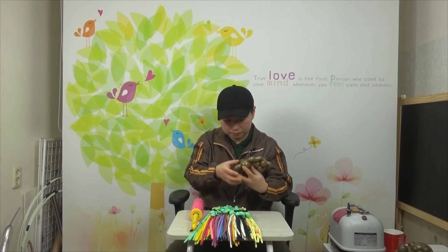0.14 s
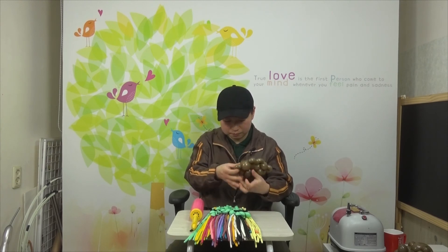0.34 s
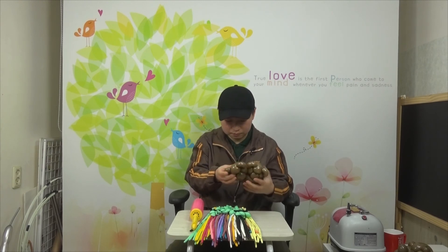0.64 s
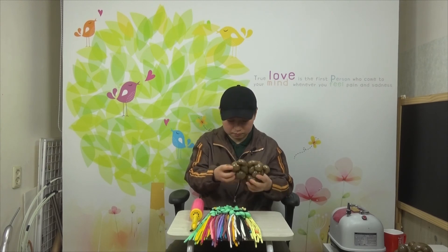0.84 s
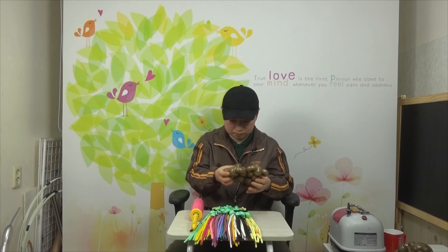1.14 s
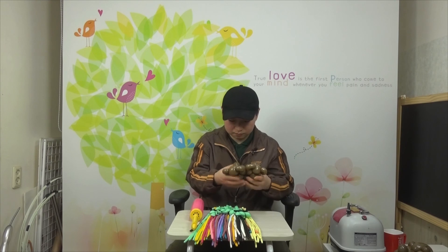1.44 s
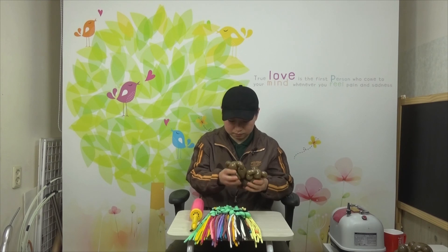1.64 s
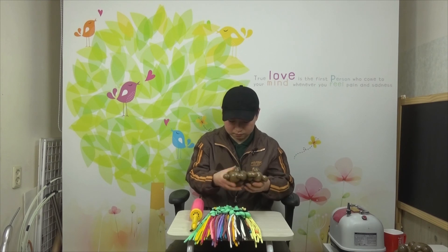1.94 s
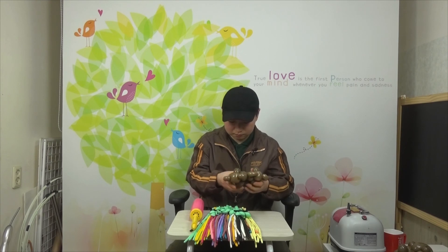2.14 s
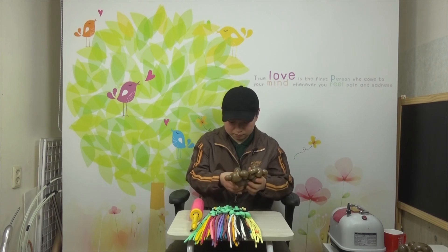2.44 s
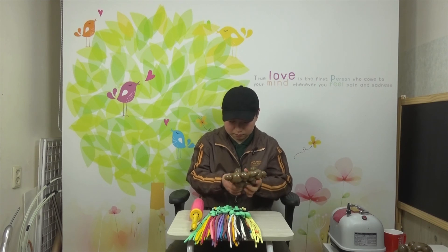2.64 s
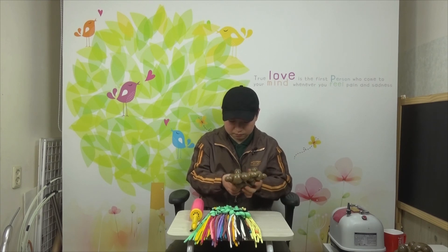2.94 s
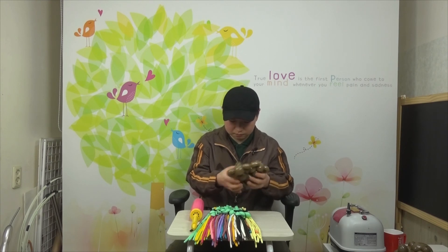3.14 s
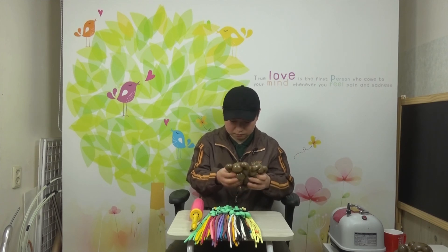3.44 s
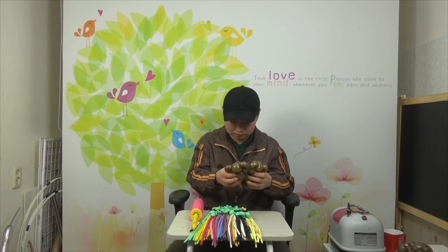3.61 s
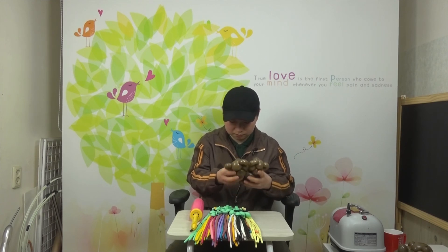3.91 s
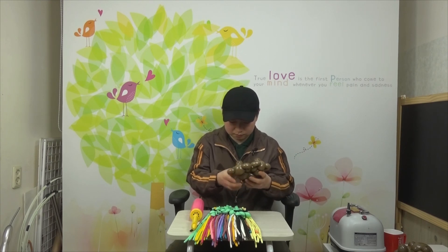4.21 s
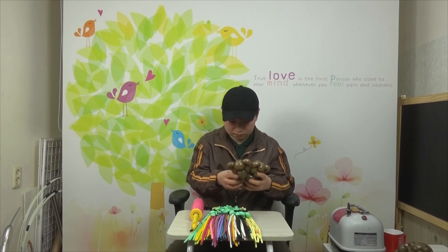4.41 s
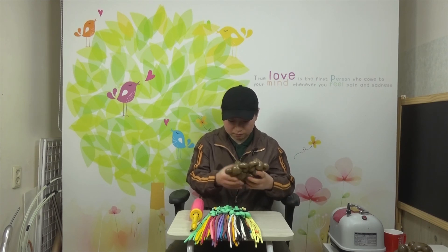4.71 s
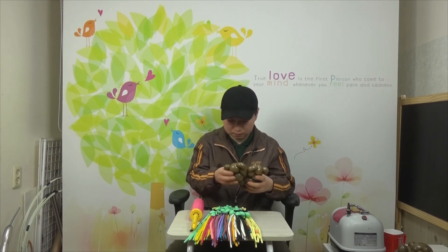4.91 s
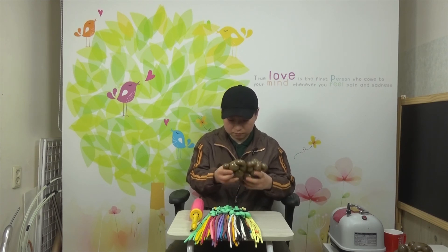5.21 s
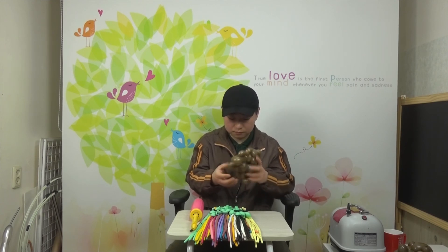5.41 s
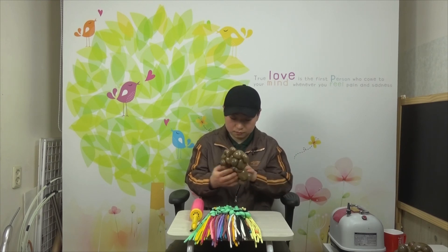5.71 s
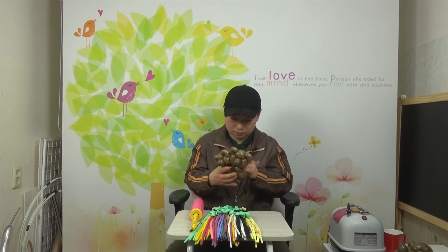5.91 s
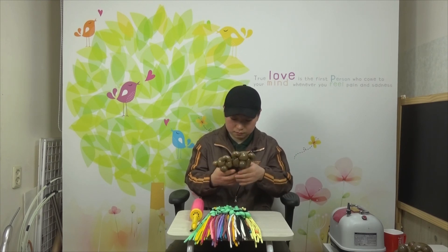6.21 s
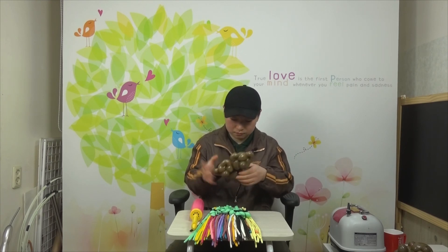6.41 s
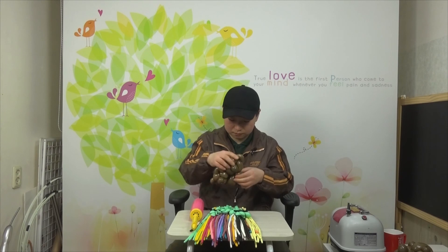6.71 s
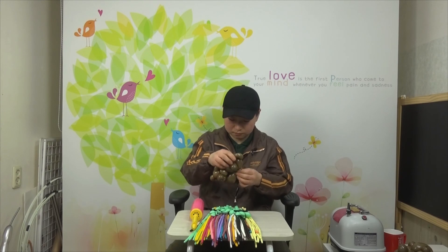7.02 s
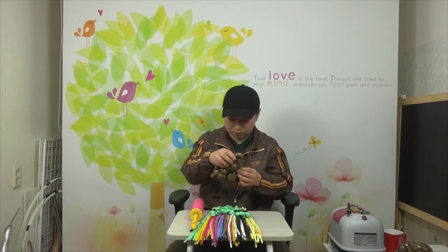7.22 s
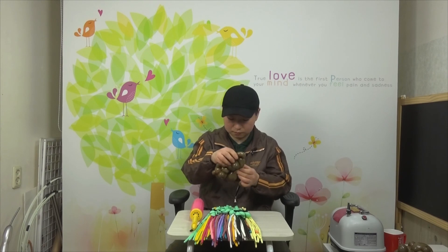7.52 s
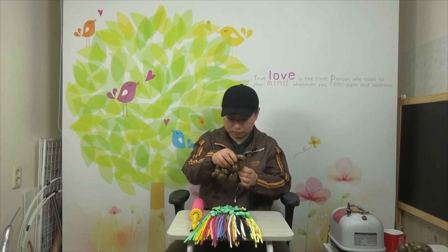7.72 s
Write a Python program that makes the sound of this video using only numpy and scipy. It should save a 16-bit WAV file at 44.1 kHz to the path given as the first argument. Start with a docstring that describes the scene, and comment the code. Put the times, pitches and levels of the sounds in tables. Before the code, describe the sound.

Latex balloons squeak, creak and snap close by as hands squeeze and adjust a twisted balloon figure in a small room.

```python
"""A figure of twisted latex balloons is squeezed and adjusted by hand, close by in a small room.
Rubber first drags over rubber in stick-slip friction; within half a second single slips snap, a bubble
groans under a finger and the bubbles thump softly as they shift. These sounds recur throughout.
From 1.2 to 3.4 s regular runs of slips creak. Near 6 s a smooth swish, like a nylon jacket brushing,
is heard; the heaviest thumps follow, and it ends in more rubbing and snapping."""
import sys
import numpy as np
from scipy import signal
from scipy.io import wavfile
from scipy.ndimage import uniform_filter1d

SR = 44100
rng = np.random.default_rng(int(sys.argv[2]) if len(sys.argv) > 2 else 0)


def output_pcm(signal):
    """Save a mono or channel-first signal as 16-bit PCM at the path in sys.argv[1].

    Samples are clipped to [-1, 1] before scaling.
    """
    pcm = np.clip(np.atleast_2d(signal).T, -1, 1) * 32767
    wavfile.write(sys.argv[1], SR, np.round(pcm).astype(np.int16))


N = 346251
TIME = np.arange(N) / SR

# The skin sounds in three ranges: body, crack and top. Levels are relative within each table.
# Each range: lower edge f/Hz, upper edge f/Hz, resonance f/Hz, bandwidth/Hz, resonance gain
BODY = (167, 1015, 490, 135, 1.2)
CRACK = (1210, 5560, 2210, 1600, 3.9)
TOP = (4170, 15800, 6200, 4700, 1.6)
# Rubbing strokes: t/s, duration/s, crack level midway/dB, swell/dB, body re crack/dB,
# top re crack/dB, rumble level/dB, slip rate/Hz, share of smooth swish (0-1)
RUB_STROKES = [(-0.02, 0.041, -44, -6, 3, -7, -59, 187, 0.9),
               (0.199, 0.14, -50.0, -9.0, 5.5, -11, -69, 130, 0.16),
               (0.349, 0.067, -37, 14, 7, -4.5, -28, 147, 0.3),
               (0.458, 0.226, -36.0, -3.0, 3, -1, -41, 221, 0.32),
               (0.722, 0.053, -44.0, 1.0, 0, -3.5, -40.5, 230, 0.26),
               (0.797, 0.22, -31.0, 15.0, -1, 1, -37, 274, 0.13),
               (1.054, 0.099, -31, 6.5, 1, -0.5, -45, 295, 0.08),
               (1.171, 0.076, -28, -5.5, 7, -3.5, -42, 340, 0.02),
               (1.293, 0.038, -37, 5.5, 2.5, 0.5, -40, 315, 0),
               (1.367, 0.033, -38, -3.5, -1, 1, -37, 290, 0), (1.452, 0.1, -44, 2, 0, 1, -41, 303, 0),
               (1.562, 0.17, -32.0, -1.0, 2, 1.5, -48, 316, 0.07),
               (1.76, 0.069, -35.0, 13.0, 2.5, -6, -58, 280, 0),
               (1.864, 0.15, -28.0, -13.0, -4, -0.5, -43.5, 238, 0.3),
               (2.274, 0.16, -40.0, -8.0, -2, -2, -50, 410, 0.37),
               (2.43, 0.12, -31.0, 21.0, -7.5, -2, -58, 430, 0.01),
               (2.609, 0.2, -35.0, -2.0, -0.5, -1.5, -54, 166, 0.19),
               (2.803, 0.18, -31.0, 0.0, -3, -4, -54, 217, 0.17),
               (2.995, 0.16, -32.0, 16.0, -3.5, -0.5, -45, 273, 0.22),
               (3.2, 0.063, -43, 0, 3, 3.5, -43, 280, 0.22), (3.288, 0.11, -37.5, 5, 11, 2, -42, 267, 0.1),
               (3.412, 0.13, -30, 0.5, -0.5, 1, -47, 320, 0.16),
               (3.576, 0.093, -47, 0, 5.5, 1, -58.5, 252, 0.21),
               (3.672, 0.077, -33, 7.5, 0, -0.5, -41, 260, 0.15),
               (3.863, 0.097, -35.0, -14.0, 3, -5, -38.5, 221, 0.17),
               (3.968, 0.08, -31.0, 4.0, -0.5, 1, -35, 183, 0.1),
               (4.191, 0.072, -30.0, 7.5, -4.5, -2, -41.5, 266, 0.19),
               (4.398, 0.14, -30.0, 7.0, -0.5, 2.5, -38, 327, 0.13),
               (4.581, 0.048, -35.0, 8.5, -1.5, 2.5, -46, 400, 0.12),
               (4.671, 0.12, -33.0, -7.0, 3.5, -0.5, -37, 366, 0.17),
               (4.899, 0.091, -34.0, 9.0, 3, 0, -47, 494, 0.07),
               (4.992, 0.121, -29.0, 4.0, 1.0, -1.0, -45, 200, 0.23),
               (5.171, 0.19, -32.5, 17, 3.0, -1.5, -40.5, 300, 0.34),
               (5.441, 0.23, -47.5, -4, -0.5, -1, -49, 200, 0.57),
               (5.687, 0.061, -34.0, 1.0, 6.5, -0.5, -33.5, 136, 0.31),
               (5.758, 0.13, -41.0, -1.0, 0, 4, -44, 164, 0.6),
               (5.877, 0.14, -33.0, -13.0, 4, -1.5, -32.5, 146, 0.29),
               (6.026, 0.21, -40.5, -17.0, -3, 1, -41, 198, 0.72),
               (6.256, 0.044, -35, 3, 2, -3.5, -36.5, 193, 0.34),
               (6.318, 0.069, -30.5, 2.5, 3, -2, -40, 208, 0.35),
               (6.406, 0.15, -34.0, -24.5, 7, -2.5, -47, 223, 0.18),
               (6.58, 0.1, -49.5, -2, 2, -2.5, -47, 210, 0.41),
               (6.709, 0.172, -32, 8.5, 3.5, -1, -31, 222, 0.31),
               (6.892, 0.027, -33.5, -0.5, -3, 0, -52, 220, 0.25),
               (6.944, 0.18, -30.0, 9.5, 2, 4.5, -41, 186, 0.26),
               (7.14, 0.074, -33, -4, 4, 2.5, -43, 139, 0.12), (7.235, 0.1, -37, -2, 3, 5, -51, 136, 0.14),
               (7.364, 0.089, -29.0, 5.5, 0.5, 0, -39, 141, 0.15),
               (7.49, 0.076, -44, 1, 6, 1, -54, 158, 0.15),
               (7.595, 0.11, -31.5, 3.5, 3, 4.5, -42.5, 171, 0.29),
               (7.719, 0.14, -36, 2, 0, 4.5, -57, 170, 0.24)]
# Single loud slips: t/s, crack level/dB, body re crack/dB, top re crack/dB, body f/Hz
SINGLE_SLIPS = [(0.2052, -29, 8.5, -32, 833), (0.2587, -43.5, -1, -2, 503), (0.3075, -41, -1, -1, 500.3),
                (0.3228, -42, -6, 0, 604.4), (0.3695, -21.5, -2, -28, 925), (0.4057, -36, -1, -17, 580),
                (0.412, -29.5, 11.5, -10, 660), (0.4696, -28, -17, 0, 540), (0.7373, -35.5, -11, -20, 510),
                (0.8057, -28, 2.5, -24.5, 370), (0.869, -23.5, -8, -1, 813), (0.998, -13, -14, -1.5, 268.1),
                (1.0826, -28, -3, -1, 735), (1.1503, -27.5, 0, -15, 763), (1.3265, -32, 0, 0, 903),
                (1.3734, -29.5, 2, -12, 493), (1.5479, -36, 10, -20, 443.4), (1.6744, -26.5, -16, -16, 480),
                (1.7317, -36, 11, -2, 543), (1.7842, -21, -4, -9, 784.4), (1.8, -31, 5, -2.5, 720),
                (1.822, -24.5, 7.5, -25, 566), (1.8299, -26.5, 14, -23, 826.4),
                (1.8695, -23.5, -11, -2.5, 600), (1.936, -11.5, -1.5, -11, 754),
                (2.0224, -37.5, 7, 10, 1000), (2.142, -35, -4, -10, 884), (2.147, -23.5, -5.5, -13, 873),
                (2.158, -24.5, 0.5, -10, 1150), (2.2188, -42, 0, -11.5, 676), (2.3236, -40.5, 17, -2, 596),
                (2.5264, -35, 16.5, -1, 599.4), (2.5526, -19, 0.5, 0, 1260),
                (2.5735, -24, -0.5, 1.5, 641.4), (2.6324, -24.5, -7, 0.5, 650), (2.666, -26, -2, 0, 923.4),
                (2.7393, -30, 1, -1, 795), (2.7733, -30.5, 1, -3.5, 605), (2.808, -22.5, -1, -9, 930.5),
                (2.8305, -24.5, 3.5, -1.5, 487.6), (2.8565, -24.5, -12, -1, 582.7),
                (2.8899, -29, -9, -1, 760), (2.9265, -28, 2.5, -2.5, 780), (2.938, -19.5, -22, -0.5, 571.3),
                (2.9676, -31, 7, 0, 725), (3.0982, -22.5, -6, -1, 1320), (3.1686, -26, 1.5, -12, 867.4),
                (3.2028, -27.5, -10, -14, 580.3), (3.235, -17.5, -0.5, -10, 649.5),
                (3.411, -29, 15, -1, 426.7), (3.5946, -33.5, -3, -2, 433.5),
                (3.6197, -34, -13, -1.5, 476.4), (3.7447, -30.5, 4.5, 1.5, 279.8),
                (3.7814, -40, 1, 3, 444.2), (3.8768, -22.5, -6, -33, 519), (3.8902, -25.5, -8, -3, 478.6),
                (3.9267, -25, -3, -0.5, 509.5), (3.9782, -25.5, -1.5, 0, 555),
                (4.0167, -25.5, -12, -6, 569), (4.2408, -27.5, 9.5, -5, 953), (4.2585, -29.5, 2.5, 7, 1054),
                (4.363, -42, 12.5, -9, 474), (4.4043, -32.5, 12.5, -18, 509), (4.6052, -29, -2, 1, 991),
                (4.6845, -25, 7, -22.5, 542.4), (4.7462, -28.5, 11.5, 2.5, 581.6),
                (4.9103, -38.5, 3, -3.5, 480), (5.1788, -29.5, 4.5, -18, 552.5),
                (5.3371, -22.5, -20, -2.5, 985), (5.3895, -30.5, 8, -1.5, 444.3),
                (5.4333, -40, 17.5, -10, 480), (5.467, -37.5, 5, -5, 466), (5.698, -20.5, 4, -3.5, 566),
                (5.7907, -24, -4.5, -9.5, 480), (5.8969, -28, 12.5, -4, 440), (5.9626, -30.5, 11, -16, 440),
                (6.214, -37.5, -6, -6.5, 500), (6.2648, -32.5, 10, -14, 469.7),
                (6.3242, -27.5, -19, -3, 984), (6.3774, -26.5, 12.5, -19, 501), (6.412, -32.5, 6, 4.5, 854),
                (6.4422, -22, 15.5, -7.5, 259.8), (6.4883, -34.5, 15.5, 4, 909), (6.515, -46, 17, 5, 480),
                (6.6624, -29.5, 11.5, -1, 1042), (6.7524, -29.5, 8.5, -1.5, 864),
                (6.7891, -26.5, 8.5, -2, 460), (6.8622, -13.5, 7, -8, 250), (6.9155, -30.5, -4, -1, 370),
                (7.041, -22.5, -3.5, -1, 996), (7.0806, -24, -12, -2, 798), (7.1066, -18, -8, 0.5, 470),
                (7.1135, -22.5, -3, 4, 826), (7.142, -24.5, -5, -20, 805), (7.2649, -22, 1.5, 2, 801),
                (7.2993, -28.5, -8, -12, 501.4), (7.3122, -28, 4.5, -1, 440.8),
                (7.417, -16, -8, -12.5, 568), (7.447, -31.5, 8, -11.5, 393), (7.5519, -35.5, -6, 0, 480),
                (7.5791, -31.5, -1, 2, 533), (7.6113, -31, -2, -7, 479.7), (7.643, -21.5, -3, 0, 656),
                (7.6831, -27.5, -6, -1.5, 639), (7.7978, -35.5, 5, 7, 990), (7.8206, -21, -2, -2.5, 522),
                (7.8411, -30.5, 10, 8.5, 483)]
# Vibrations of a whole bubble: t/s, duration/s, first f/Hz, last f/Hz, level/dB
BUBBLE_GLIDES = [(0.369, 0.0076, 890, 975, -4.5), (0.517, 0.048, 92, 145, -12.5),
                 (0.653, 0.02, 425.4, 560, -13.5), (1.195, 0.035, 678, 722, -14),
                 (1.597, 0.046, 353, 248.8, -27.5), (1.665, 0.099, 288.1, 350.8, -24),
                 (1.932, 0.024, 720, 705, -13.5), (2.323, .018, 643, 379.5, -28),
                 (4.692, 0.027, 485, 426.4, -16), (5, 0.023, 269.1, 211.8, -23.5),
                 (5.035, 0.1064, 191.7, 148, -19), (5.254, 0.082, 318.5, 239.7, -26.5),
                 (5.4315, 0.0106, 636.6, 592, -18.5), (5.89, 0.04, 439, 375.5, -16),
                 (6.365, .019, 580.3, 505.8, -16), (6.444, 0.0207, 458, 496, -9.5),
                 (6.464, 0.053, 462, 527, -22), (6.865, 0.01585, 335.7, 284, -7.5)]
# Bumps of the bubbles in the hands: t/s, peak level/dB, f/Hz, decay time/s
BUBBLE_BUMPS = [(.380, -20, 122, 0.011), (0.411, -9, 103, 0.0056), (0.612, -11, 94, 0.0079),
                (.652, -13, 102, .012), (.690, -22, 42, 0.021), (0.802, -16, 61.5, 0.0078),
                (0.997, -15, 132, 0.0031), (1.173, -18, 136.4, 0.0075), (1.413, -33, 55, 0.02),
                (1.469, -25.5, 78, 0.012), (1.553, -26, 40.8, 0.024), (2.178, -27.5, 63, 0.017),
                (2.335, -23.5, 73, .03), (2.548, -23, 116, 0.0076), (2.556, -27, 30.41, 0.027),
                (3.892, -25, 39.04, 0.03), (3.963, -19.5, 77.26, .022), (4.404, -18.5, 77.13, 0.013),
                (4.684, -22, 108, .011), (5.593, -23, 70.46, .011), (5.698, -18.5, 85.7, 0.021),
                (5.891, -28, 95, 0.017), (5.954, -7, 58, 0.02), (6.077, -38, 83.54, 0.014),
                (6.278, -22, 54.13, 0.034), (6.380, -15, 90, 0.018), (6.4411, -3.5, 115.6, 0.009),
                (6.459, -16, 84, 0.021), (6.711, -22, 69.5, .03), (6.785, -26, 65, 0.025),
                (6.8604, -9.5, 147, 0.0056), (7.107, -22.5, 90, 0.0098), (7.450, -18, 61.53, 0.015),
                (7.838, -29, 44.83, .02)]
# Regular runs of slips: t/s, duration/s, first rate/Hz, last rate/Hz, crack level/dB,
# body re crack/dB, top re crack/dB, body f/Hz, change of crack over the run/dB
SLIP_RUNS = [(1.181, 0.025, 320, 340, -19.5, 2.5, -1, 724, -3),
             (1.866, 0.07, 400, 400, -34, -23, -2.5, 610, 6),
             (2.281, 0.02, 220, 140, -23.5, -9, -20, 790, -3),
             (2.408, 0.025, 560, 294, -18, -3, -11.5, 780, -1.5),
             (3.2943, .012, 125, 142, -16.5, 2, -9, 599, 6),
             (3.3212, .065, 92, 139, -17, 2.5, -1, 852, 5.5),
             (3.3895, 0.015, 150, 127, -28.5, 13, -17.5, 493, -7)]
# Hollow modes of a slowly twisted bubble: f/Hz, T60/s, level/dB
HOLLOW_MODES = [(429.1, 0.02, 0.5), (870, 0.013, 4.5), (2220, 0.013, -3.5), (2892, .005, 3),
                (4156, .004, -3.5), (7321, 0.0051, -3.5)]
# Lingering resonances of the balloons and the room: f/Hz, T60/s, level/dB
LINGERING_MODES = [(484, 0.28, -3), (717, 0.25, -3.5), (970, 0.14, -1), (2230, 0.033, -12)]

SNAP_DECAY_S = 0.0021


def from_db(db):
    """The decibel law: amplitude grows tenfold in 20 dB."""
    return 10 ** (np.asarray(db) / 20)


def rms_one(x):
    """Normalisation to unit mean power."""
    return x / np.sqrt(np.mean(x ** 2) + 1e-20)


def unit_energy(x):
    """Normalisation to the energy of 5 ms at unit power."""
    return x / np.sqrt(np.sum(x ** 2) / (SR / 200) + 1e-20)


def evened(x, span_s=0.0376):
    """Division by the running rms holds the slow level near 1 and keeps the grain."""
    power = uniform_filter1d(x ** 2, int(span_s * SR) + 1)
    return x / np.sqrt(np.maximum(power, 0) + np.mean(x ** 2) / 100)


def seconds(length):
    """Uniform sampling of a time interval."""
    return np.arange(int(length * SR)) / SR


def add(out, start, sound):
    """Linear superposition of a sound from its start time on."""
    at = max(round(start * SR), 0)
    out[at:at + len(sound)] += sound[:max(N - at, 0)]


def band(x, low_hz, high_hz, order=3):
    """Band-pass filtering, maximally flat between the edges."""
    edges = [low_hz, min(high_hz, .45 * SR)]
    return signal.sosfilt(signal.butter(order, edges, "band", fs=SR, output="sos"), x)


def resonate(x, hz, width_hz):
    """Forced response of a damped oscillator, with unit gain at resonance."""
    r = np.exp(-np.pi * width_hz / SR)
    feedback = [1, -2 * r * np.cos(2 * np.pi * hz / SR), r * r]
    return signal.lfilter(np.array([1, 0, -1]) * (1 - r * r) / 2, feedback, x + 1e-18)


def drift(rate_hz):
    """Random fluctuation with a spread near 1, interpolated between independent values."""
    steps = rng.standard_normal(int(N / SR * rate_hz) + 2)
    return np.interp(TIME * rate_hz, np.arange(len(steps)), steps)


def skin_response(x, skin_range):
    """A broad resonance colours the excitation within one range of the skin."""
    low_hz, high_hz, hz, width_hz, gain = skin_range
    return band(x + gain * resonate(x, hz, width_hz), low_hz, high_hz)


def stroke_power(start, length, swell_db, release_db_per_s, attack_s=0.015):
    """Power envelope of a driven vibration: quick onset, swell or fade, then exponential decay."""
    t = TIME - start
    hold_db = swell_db * (np.clip(t / length, 0, 1) - .5)
    release_db = np.clip(release_db_per_s * (t - length), 0, 100)
    return (np.clip(t / attack_s, 0, 1) * from_db(hold_db - release_db)) ** 2


def strokes(rest_db=-65, rest_rumble_db=-85, rest_slip_hz=200):
    """Incoherent strokes add in power; slip rate and swish share are power-weighted means."""
    body, crack, top = np.full((3, N), from_db(rest_db) ** 2)
    sway = np.full(N, from_db(rest_rumble_db) ** 2)
    rate, swish = rest_slip_hz * crack, crack.copy()   # between strokes only a faint swish remains
    for start, length, db, swell_db, body_db, top_db, rumble_db, slip_hz, smooth in RUB_STROKES:
        power = from_db(db) ** 2 * stroke_power(start, length, swell_db, release_db_per_s=550)
        body += power * from_db(body_db) ** 2
        crack += power
        top += power * from_db(top_db) ** 2
        # the whole figure settles more slowly than the skin
        sway += from_db(rumble_db) ** 2 * stroke_power(start, length, 0, release_db_per_s=185)
        rate += power * slip_hz
        swish += power * smooth
    return np.sqrt([body, crack, top, sway]), rate / crack, np.clip(swish / crack, 0, 1)


def stick_slip(rate, wander=.2, jitter=.5, uneven_db=7.0, decay_s=0.0014, loose_hz=205):
    """Relaxation oscillation: a train of small slips, erratic when slow, more even when fast."""
    loose = np.minimum(loose_hz / rate, 1.2)
    cycles = np.cumsum(rate * np.exp(wander * drift(25) + jitter * loose * drift(170))) / SR
    strength = from_db(uneven_db * loose * np.clip(rng.standard_normal(N), -2, 2))
    slips = np.diff(np.floor(cycles), prepend=0) * strength
    out, t, hop = np.zeros(N), seconds(.008), SR // 40
    window = np.sqrt(np.hanning(2 * hop))
    for at in range(0, N, hop):   # the skin's ring changes as the contact travels
        patch = slips[at:at + 2 * hop]
        ring = rng.standard_normal(len(t)) * np.exp(-t / decay_s)
        add(out, at / SR, signal.fftconvolve(patch * window[:len(patch)], ring))
    return out


def rubbing(body, crack, top, rate, smooth):
    """Friction noise: the grain of gripping rubber, blended with a smooth swish like brushing nylon."""
    grain = np.sqrt(1 - smooth) * evened(stick_slip(rate))
    swish = np.sqrt(smooth) * rng.standard_normal(N)
    ranges = (BODY, body, -0.18), (CRACK, crack, -0.5), (TOP, top, -1.28)
    return sum(envelope * from_db(trim_db) * evened(skin_response(grain + swish, skin_range))
               for skin_range, envelope, trim_db in ranges)


def rumble(sway, gain_db=3.0):
    """Motion of the whole figure radiates low noise, amplitude-modulated by the strokes."""
    return sway * from_db(gain_db) * evened(band(rng.standard_normal(N), 9.6, 161, order=2), span_s=0.24)


def reverberation(x, gap_s=0.0042, t60_s=0.33, tail_db=-11.5, dull_hz=5370):
    """Diffuse reflections decay exponentially, duller than the direct sound; a few modes linger."""
    t = seconds(.4)
    reflections = rng.standard_normal(len(t)) * from_db(-60 * t / t60_s) * (t > gap_s)
    tail = band(reflections, 180, dull_hz, order=1)
    tail *= np.sqrt(2 * dull_hz / SR / np.sum(tail ** 2))
    notes = sum(from_db(db) * resonate(x, hz, np.log(1000) / (np.pi * t60))
                for hz, t60, db in LINGERING_MODES)
    return from_db(tail_db) * signal.fftconvolve(x, tail)[:N] + notes


def room_tone(murk_db=-62, hiss_db=-74):
    """A stationary noise floor: a faint dull band and white hiss."""
    murk = rms_one(band(rng.standard_normal(N), 250, 1500, order=2))
    return from_db(murk_db) * murk + from_db(hiss_db) * rng.standard_normal(N)


def slip(body_db, top_db, body_hz, decay_s, body_decay_s=0.0032, scatter=0.72, octaves_per_db=0.43):
    """Impulse response of the skin's dense modes, new at each place: returns body, and crack with top."""
    t = seconds(.03)
    noise = rng.standard_normal((3, len(t)))
    body_fade = np.exp(-t / body_decay_s)
    note = unit_energy(np.sin(2 * np.pi * body_hz * t) * body_fade)
    body = unit_energy(note + scatter * unit_energy(skin_response(noise[0] * body_fade, BODY)))
    tuning = 2 ** np.clip(octaves_per_db * top_db, -1, .5)   # taut skin is brighter and rings higher
    crack = resonate(noise[1] * np.exp(-t / decay_s), 3100 * tuning, 2700 * tuning)
    top = resonate(noise[2] * np.exp(-t / (0.7 * decay_s)), 6800 * tuning, 8000 * tuning)
    crack = unit_energy(band(crack, *CRACK[:2]))
    top = unit_energy(band(top, *TOP[:2]))
    return from_db(body_db) * body, crack + from_db(top_db) * top


def ticks(crack, per_s=14, level_db=-41.5, spread_db=8.5, low_hz=398, high_hz=960, draws=200):
    """Small slips occur at random, their amplitude following a power law of the rubbing's envelope."""
    out, effort = np.zeros(N), rms_one(crack) ** 0.54
    for start, size, hz in rng.uniform([0, -1, low_hz], [draws / per_s, 1, high_hz], (draws, 3)):
        tick = sum(slip(body_db=4.5, top_db=-2.5, body_hz=hz, decay_s=SNAP_DECAY_S))
        add(out, start, from_db(level_db + spread_db * size) * effort[min(int(start * SR), N - 1)] * tick)
    return out


def snaps(duller_db_per_doubling=29):
    """Static friction gives way in one slip; slack skin snaps duller and rings longer."""
    out = np.zeros(N)
    for start, db, body_db, top_db, body_hz in SINGLE_SLIPS:
        decay_s = SNAP_DECAY_S * 2 ** (-top_db / duller_db_per_doubling)
        add(out, start, from_db(db) * sum(slip(body_db, top_db, body_hz, decay_s)))
    return out


def groans(overtone_db=-14, waver=0.084, flutter_db=2.5, fade_db=-3, rasp=0.28):
    """Friction-excited vibration of a whole bubble: a gliding tone, unsteady as the grip changes."""
    out, wobble = np.zeros(N), drift(220)
    flutter = from_db(flutter_db * drift(120)) * (1 + rasp * drift(500))
    for start, length, first_hz, last_hz, db in BUBBLE_GLIDES:
        count = int(length * SR)
        hz = np.linspace(first_hz, last_hz, count) * (1 + waver * wobble[int(start * SR):][:count])
        phase = 2 * np.pi * np.cumsum(hz) / SR
        tone = sum(from_db(overtone_db * k) * np.sin((k + 1) * phase) for k in range(3))
        envelope = from_db(db + np.linspace(0, fade_db, count)) * signal.windows.tukey(count, .3)
        add(out, start, envelope * tone)
    return out * flutter


def thumps(rise_share=0.11):
    """Soft impacts of the shifting bubbles excite low damped oscillations."""
    out, t = np.zeros(N), seconds(.2)
    for start, db, hz, decay_s in BUBBLE_BUMPS:
        swell = (1 - np.exp(-t / (rise_share * decay_s))) ** 2 * np.exp(-t / decay_s)
        add(out, start, from_db(db) * swell / swell.max() * np.sin(2 * np.pi * hz * t))
    return out


def creaks(jitter=0.019, rough_hz=260, renewal=0.19, hollow_hz=165, twist_db=-1.5):
    """Periodic stick-slip at one spot: slow runs repeat cleanly and ring hollow, fast ones turn rough."""
    out = np.zeros(N)
    for start, length, first_rate, last_rate, db, body_db, top_db, body_hz, fade_db in SLIP_RUNS:
        spot = body_db, top_db, body_hz, .0009, .0022   # last two: crack and body decay time/s
        body, crack = slip(*spot)
        hollow = 1 / (1 + (first_rate / hollow_hz) ** 8)
        twist_gain = from_db(twist_db) * np.hypot(1, from_db(body_db))
        progress = 0
        while progress < 1:
            rate = first_rate + (last_rate - first_rate) * progress
            rough = (rate / rough_hz) ** 2
            fresh_crack = (crack + renewal * rough * slip(*spot)[1]) / np.hypot(1, renewal * rough)
            skin = np.sqrt(1 - hollow) * (body + from_db(fade_db * progress) * fresh_crack)
            ring = np.sqrt(hollow) * twist_gain * twist_ring()
            add(out, start + progress * length, from_db(db) * (skin + ring))
            progress += np.exp(jitter * rough * rng.standard_normal()) / rate / length
    return out


def twist_ring(scatter_db=4):
    """Free decay of a twisted bubble's modes, which each slip strikes a little differently."""
    t = seconds(.03)
    modes = sum(from_db(db + rng.normal(0, scatter_db) - 60 * t / t60) * np.sin(2 * np.pi * hz * t)
                for hz, t60, db in HOLLOW_MODES)
    return unit_energy(band(modes, 287.3, 8200, order=2))


def scene(snap_db=1.95, creak_db=-2.5, groan_db=-0.5):
    """Superposition of the direct sound, its reverberation and the noise floor."""
    (body, crack, top, sway), rate, smooth = strokes()
    singles = from_db(snap_db) * snaps() + ticks(crack)
    taut_ring = 0.32 * resonate(singles, hz=4110, width_hz=200)   # single slips also ring the taut skin
    direct = singles + taut_ring + from_db(creak_db) * creaks()
    direct += rubbing(body, crack, top, rate, smooth)
    direct += from_db(groan_db) * groans() + rumble(sway) + thumps()
    return (direct + reverberation(direct) + room_tone())[None]


def record(dry, ceiling=.95, cutoff_hz=16000):
    """Hard clipping limits the highest peaks; a steep low-pass filter cuts the extreme treble."""
    clipped = np.clip(dry, -ceiling, ceiling)
    return signal.sosfilt(signal.ellip(10, .2, 70, cutoff_hz, fs=SR, output="sos"), clipped)


dry = scene()
out = record(dry)
output_pcm(out)
```